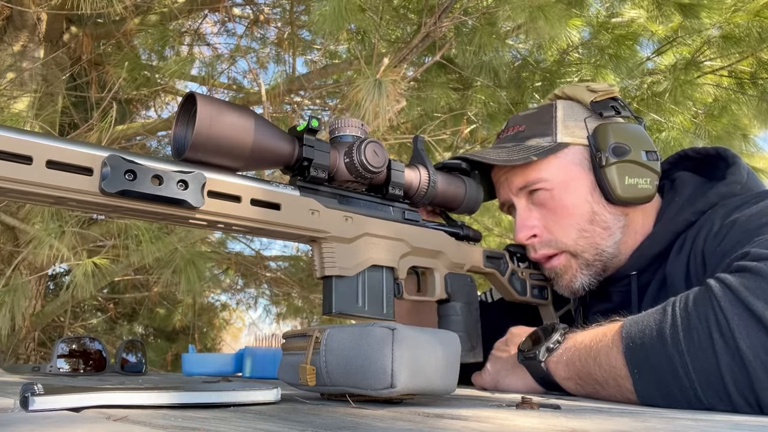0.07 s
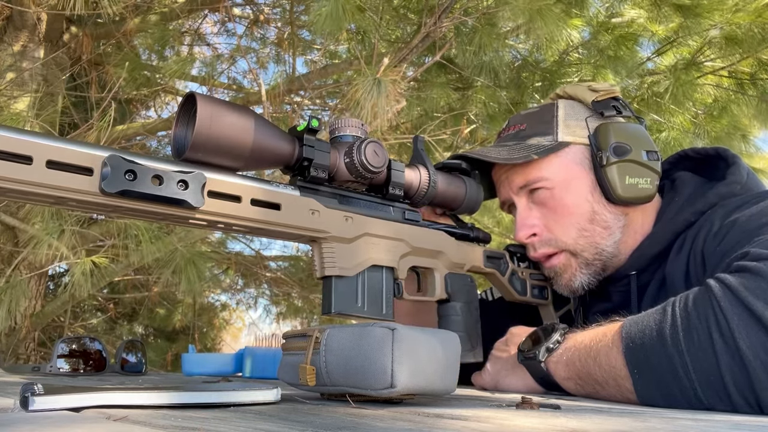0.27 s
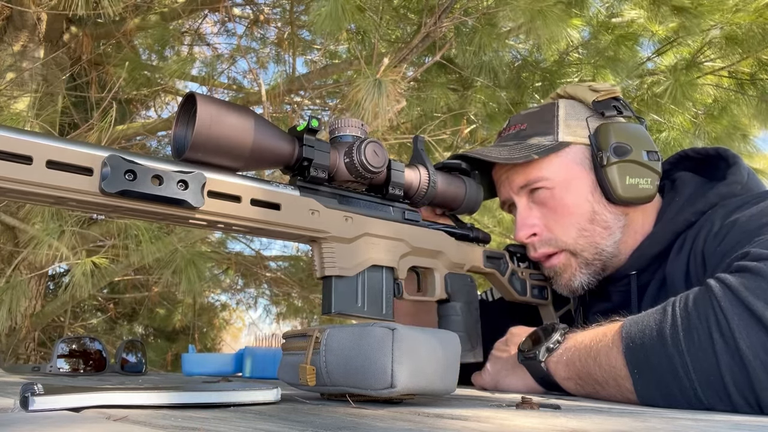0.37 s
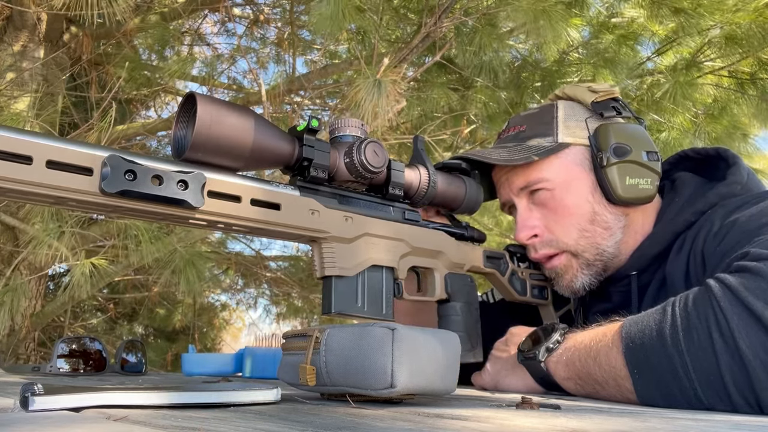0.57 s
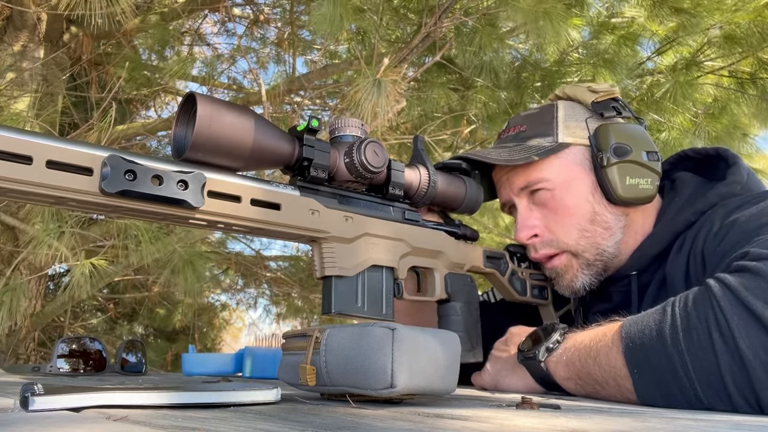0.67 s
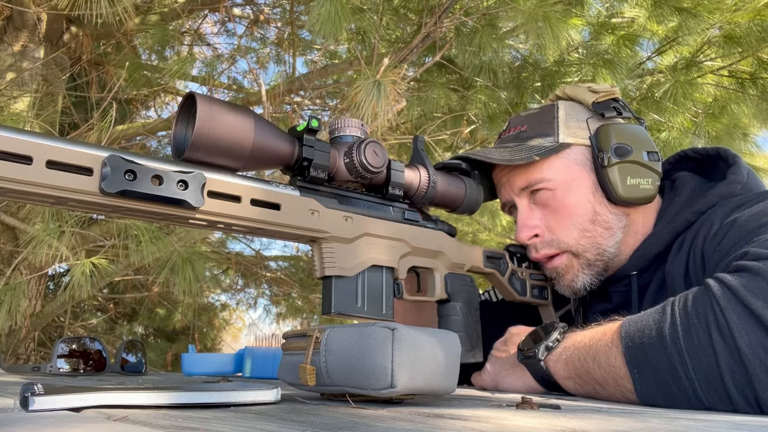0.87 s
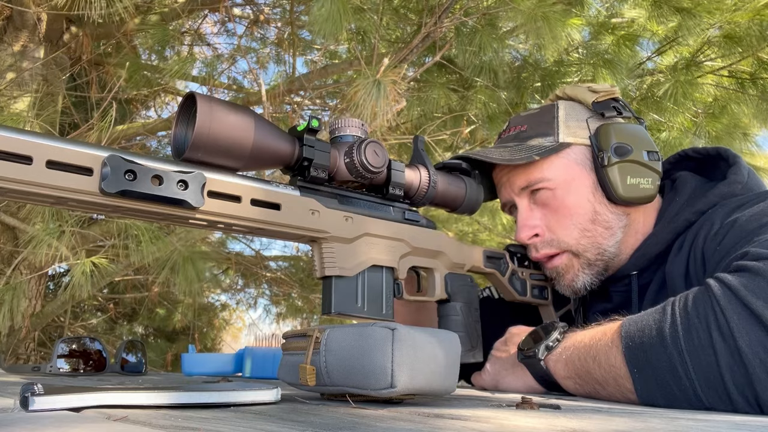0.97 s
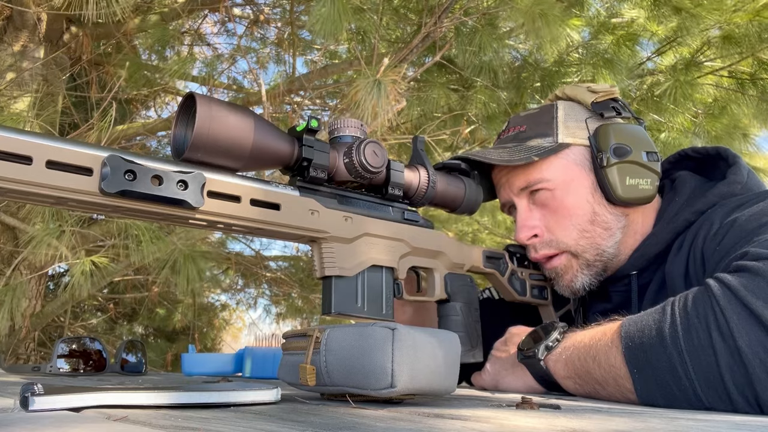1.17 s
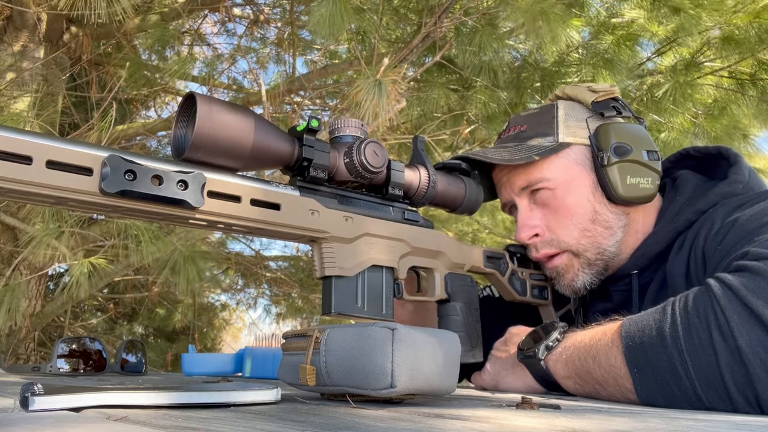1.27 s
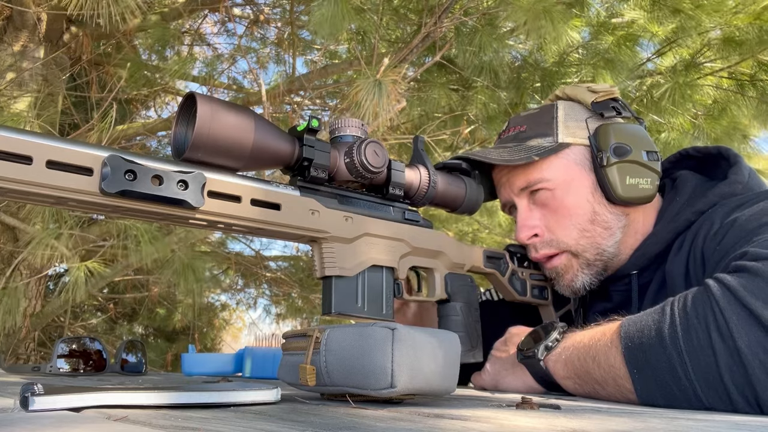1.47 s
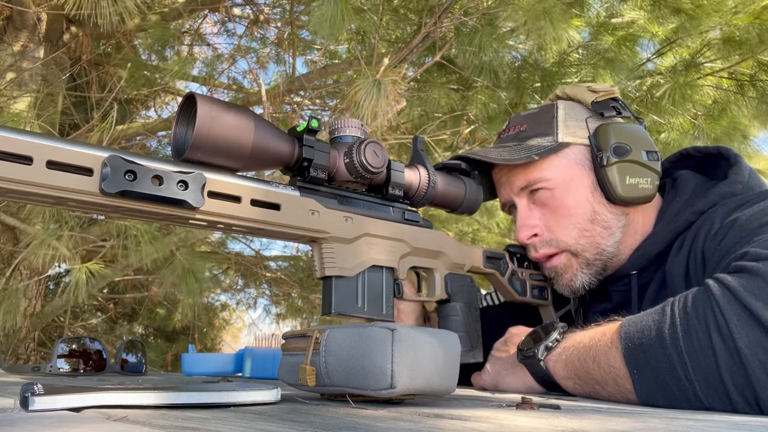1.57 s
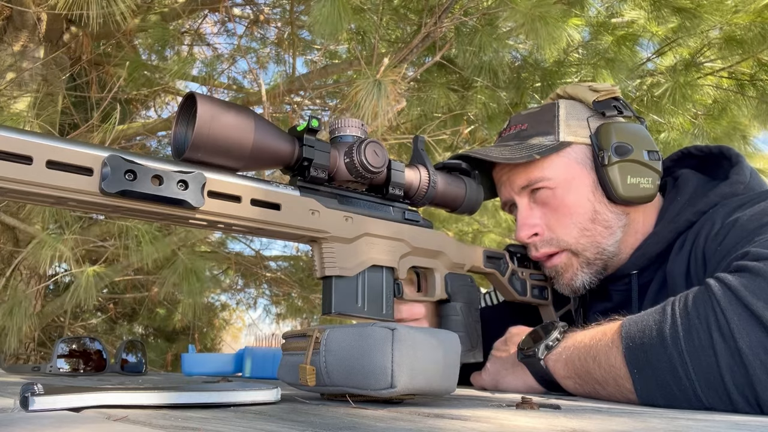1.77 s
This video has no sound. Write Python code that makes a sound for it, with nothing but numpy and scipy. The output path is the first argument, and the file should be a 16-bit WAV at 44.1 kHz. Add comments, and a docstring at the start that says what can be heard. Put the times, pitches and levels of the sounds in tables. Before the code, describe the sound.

A rifle bolt is lifted, drawn back, pushed home and locked with crisp steel clacks, brief scrapes and hollow stock knocks, close to the microphone on an outdoor bench; faint birds chirp behind low air rumble.

```python
"""Rifle bolt on a bench

A rifle lying on a wooden bench outdoors has its bolt cycled: lifted, drawn back, pushed home and locked.
Steel contacts are bursts of noise with ringing tones for the steel parts and the stock; filtered noise makes
the scrape of the bolt and the rubs of hand and sleeve. Slow-starting low tones make the bench boom.
Fading noise spreads reflections around; gliding tones are far birds, and filtered noise is the rumbling air.
"""
import sys
import numpy as np
from scipy import signal
from scipy.fft import rfft, irfft
from scipy.io import wavfile

SR = 44100
rng = np.random.default_rng(int(sys.argv[2]) if len(sys.argv) > 2 else 0)


def digitize_waveform(pressure):
    """Quantize a signal to 16-bit integers and store it at the path in sys.argv[1].

    Rows of a 2-D input are taken as channels; values are limited to [-1, 1].
    """
    field = np.atleast_2d(pressure).T
    bounded = np.clip(field, -1, 1)
    quanta = np.round(bounded * 32767).astype(np.int16)
    wavfile.write(sys.argv[1], SR, quanta)


N = 81585

# Hard steel contacts. Each row: peak of the crack in seconds, rise in seconds, fall in seconds, six crack levels
# in dB (one for each pitch in CRACK_HZ), knock pitch in Hz, knock level in dB, knock time to fade by 60 dB
# in seconds, pitch of the struck part in Hz, its level in dB.
CLACKS = [ (0.22, 0.0015, .0018, -49.5, -21, -26.5, -25.5, -17.5, -26, 847, -4, 0.04, 3320, -7.5),
          (.2660, 0.0012, .0025, -35, -30, -27.5, -27, -20.5, -27.5, 856.7, -13, 0.06, 5270, -18.5),
          (0.631, 0.00068, .0018, -50, -59.5, -48, -40.5, -28, -37, 760, -28.5, .04, 5840, -3),
          (0.8512, 0.001012, .0030, -54.5, -25.5, -27, -27, -21, -36, 937, -15, 0.056, 4000, -16.5),
          (0.8713, 0.0009, .0025, -48.5, -25.5, -24, -28.5, -16.5, -26, 868, -11, 0.027, 8050, -14),
          (.8780, 0.006, .0070, -47, -21, -45.5, -23.5, -17.5, -34.5, 611, -23, 0.041, 5106, 2),
          (0.951, 0.0092, 0.02, -48, -58.5, -38, -35, -28, -46, 780, -26, 0.044, 4005, -30),
          (1.0203, 0.0038, 0.0034, -44.5, -38, -38, -37.5, -32.5, -44.5, 759, -26.5, 0.054, 3050, -18.5),
          (1.374, .0012, .0016, -38, -31, -24.5, -28.5, -12.5, -29, 805, -10, 0.014, 3020, -10),
          (1.424, 0.00038, .0026, -61, -58.5, -41.5, -40.5, -26, -35, 930, -56.5, .03, 3765, -17.5),
          (1.5764, .0009, 0.0045, -42.5, -32, -40.5, -33, -31, -44, 912, -13.5, 0.048, 3210, -20)]
# Pitches at which the crack levels are given, in Hz.
CRACK_HZ = [400, 800, 1600, 3200, 6400, 12000]
# Light touches of hand and bolt.
# Each row: peak of the tick and start of the knock in seconds, stock knock in dB, steel tick in dB.
TOUCHES = [(0.127, -44.5, -81), (.337, -37.5, -55), (.534, -46.5, -71), (.597, -50, -44.5),
           (.645, -23, -46.5), (.684, -32, -60), (0.696, -45.5, -54), (.767, -26.5, -49),
           (.890, -21, -28.5), (0.903, -25, -35), (.922, -47, -38), (1.004, -40, -35.5),
           (1.121, -37.5, -54), (1.254, -40.5, -78)]
# Tone colour of a light tick: relative level in dB at each pitch in CRACK_HZ.
TOUCH_COLOUR_DB = [-24.5, -14, -2.5, -8.5, -5.5, -25.5]
# Tones of the stock under a light touch. Each row: pitch in Hz, relative level in dB, 60 dB fade in seconds.
TOUCH_KNOCK = [(700, -8, .028), (800, -3, .03), (915, -5, .032)]
# Tones of the knocked stock. Each row: pitch in Hz, relative level in dB, 60 dB fade in seconds.
STOCK = [(368.1, -26, 0.18), (424.3, -25, 0.17), (745, -26.5, .06), (776, -20.5, 0.11), (901, -15.5, .11),
         (1128, -29.5, .06)]
# Tones of the ringing steel. Each row: pitch in Hz, relative level in dB, 60 dB fade in seconds.
STEEL = [(2875, -5, .12), (3160, -4, .11), (3370, -4, .1), (4020, -5, .08), (4810, -2, .06),
         (5324, -3, .07), (5803, -5, .1), (6190, -7, .14), (7100, -6, .07), (11500, -6, .06)]
# Friction of the sliding bolt over time. Each row: time in seconds, level in dB.
SLIDE = [(0, -113), (.19, -67.5), (.21, -45.5), (.33, -53), (.44, -89), (.55, -65), (.61, -44.5),
         (.67, -62), (.745, -66.5), (.78, -50), (.84, -39), (.92, -46.5), (1.0, -48), (1.04, -42.5),
         (1.08, -62), (1.2, -74.5), (1.33, -82), (1.37, -40.5), (1.48, -60.5), (1.56, -50), (1.65, -71.5),
         (1.85, -77.5)]
# Tone colour of the friction. Each row: pitch in Hz, relative level in dB per Hz.
SLIDE_COLOUR = [(150, -11.5), (400, 3), (600, 7.5), (850, 17), (1200, 2.5), (2200, -3), (3500, -5),
                (5500, -0.5), (8000, -18.5), (12000, -24), (15000, -39.5)]
# Soft rubs of hand and sleeve on the stock. Each row: middle in seconds, half length in seconds, level in dB.
RUBS = [(0.134, 0.013, -61.5), (0.338, 0.035, -52), (0.554, 0.033, -58.5), (0.707, 0.0079, -51.5),
        (0.962, 0.023, -52), (1.839, 0.024, -62)]
# Tone colour of the rubs. Each row: pitch in Hz, relative level in dB per Hz.
RUB_COLOUR = [(120, -20.5), (300, 2), (420, 2.5), (650, -4), (1200, -13), (2500, -26.5), (5000, -26.5),
              (9000, -41.5), (15000, -55)]
# Jolts that reach the bench through the rest bag.
# Each row: start in seconds, level in dB, tilt towards the higher tones in dB per octave.
THUMPS = [(.274, -21, 3), (.708, -35.5, 3.5), (0.883, -32.5, 1.5), (1.04, -33.5, 0.5), (1.38, -31, 14.5),
          (1.585, -29, -6.5)]
# Tones of the bench top. Each row: pitch in Hz, relative level in dB, 60 dB fade in seconds.
BENCH = [(60.5, -2, 0.29), (97, 0.5, .22), (119.6, -9.5, 0.21), (182.3, -11.5, .22)]
# Delay of the right side. Each row: pitch in Hz, delay in seconds.
RIGHT_LAG_S = [(300, 0.00017), (900, 0.00018), (3000, 0.000047), (6000, 0.000078), (9000, 0.000069),
               (13000, 0.000083)]
# Bird notes. Each row: start in seconds, length in seconds, pitch in Hz, final drop in Hz, level in dB.
CHIRPS = [(-.045, .085, 2700, 450, -66), (.02, .14, 2470, 30, -69), (.44, .15, 2460, 30, -71),
          (.665, .05, 2400, 40, -63), (1.755, .115, 3070, 1300, -67)]
# Tone colour of the quiet air. Each row: pitch in Hz, relative level in dB per Hz.
AIR = [(25, -5.5), (60, 3.5), (120, 1.5), (230, -20), (500, -18), (800, -17.5), (1100, -19), (1400, -14),
       (1900, -28.5), (3300, -34), (6000, -41.5), (10000, -50.5), (15000, -54.5)]
# Low rumble over time. Each row: time in seconds, level in dB.
RUMBLE = [(0, -67), (.2, -49.5), (.42, -50.5), (.6, -52.5), (.7, -49.5), (.73, -41), (.8, -43), (1.08, -47),
          (1.22, -51.5), (1.35, -56.5), (1.45, -44.5), (1.55, -52.5), (1.65, -41.5), (1.8, -54.5)]
# Tone colour of the rumble. Each row: pitch in Hz, relative level in dB per Hz.
RUMBLE_COLOUR = [(25, -24.5), (55, 8.5), (100, 4.5), (160, -10), (300, -19.5), (900, -55.5)]

# Contacts: the lead is the time from the start of a burst to its peak.
LEAD_S, LEVEL_WINDOW_S = 0.02, 0.01
CHATTER_DB, CHATTER_S = -21.5, 0.013  # loose parts buzz on after a contact
GRAIN_DB = 3  # unevenness of the tiny impacts
STRIKE_SPREAD_DB = 2  # no two blows excite a tone alike
RING_ONSET_S = 0.001
STEEL_DB = -11  # ringing steel against the treble of the crack
PART_SPLIT, PART_TWIN_DB, PART_T60_S = 0.035, -9.5, 0.022  # the second tone is lower by this fraction
TOUCH_RISE_S, TOUCH_FALL_S = 0.0006, 0.003
SLIDE_GRAIN_DB = 5.5
BENCH_SOFT_S, BENCH_PIVOT_HZ = 0.011, 98

# Reflections: level in dB, time to fade by 60 dB in seconds, and a filter pitch in Hz.
GLANCE_DB, GLANCE_T60_S, GLANCE_HZ = -6, 0.003, 3000  # the treble glances off scope and chassis
NEAR_DB, NEAR_T60_S = -10, 0.07  # bench and shooter
BOARDS_DB, BOARDS_T60_S, BOARDS_HZ = -2, 0.17, 420  # the planks resound under the rifle
TAIL_DB, TAIL_T60_S, TAIL_DULL_HZ = -33, 0.6, 3000  # scatter from the trees
BIRD_ECHO_DB, BIRD_ECHO_T60_S = -5, 0.2  # far calls come blurred through the trees

BIRD_BEND = 3.5  # the higher, the later a note drops
AIR_DB, LEFT_DB = -61.5, 0.9
CUTOFF_HZ, TOP_HZ = 16500, 13900

T = np.arange(N) / SR
SHORT = T[:SR // 5]
EDGES = np.geomspace(200, 16000, 14)  # borders of the crack's bands, in Hz
BANK = [signal.butter(2, pair, "band", fs=SR, output="sos") for pair in zip(EDGES, EDGES[1:])]


def amp(db):
    """Turn decibels into a gain."""
    return 10 ** (np.asarray(db) / 20)


def unit(x):
    """Scale a sound to an average (rms) level of 1."""
    return x / np.sqrt(np.mean(x ** 2) + 1e-30)


def add(out, s, x):
    """Mix x into out from time s."""
    i = max(int(s * SR), 0)
    out[i:i + len(x)] += x[:max(N - i, 0)]


def level(curve):
    """Draw a gain over time through points of seconds and dB."""
    return amp(np.interp(T, *np.transpose(curve)))


def coloured(x, points):
    """Shape the spectrum of x through points of Hz and dB, then scale it to rms 1."""
    hz, db = np.transpose(points)
    f = np.maximum(np.fft.rfftfreq(N, 1 / SR), 1)
    gain = amp(np.interp(np.log(f), np.log(hz), db))
    gain = gain * (f > 24)  # drop the very lowest pitches
    return unit(irfft(rfft(x) * gain, N))


def ring(modes, t, onset_s):
    """A struck body sounds fading tones, which swell in softly over the onset."""
    # A single tone keeps its exact level; several each get a chance strength.
    spread_db = STRIKE_SPREAD_DB * (len(modes) > 1)
    tones = 0
    for hz, db, t60 in modes:
        fade = amp(db + spread_db * rng.normal() - 60 * t / t60)
        tones = tones + fade * np.sin(2 * np.pi * hz * t)
    return tones * (1 - np.exp(-t / onset_s))


def crack(rise, fall, octave_db):
    """Tiny impacts crowd up to a peak and die away, with a separate strength in each band."""
    t = SHORT - LEAD_S
    after = np.maximum(t, 0)
    chatter = amp(CHATTER_DB) * np.exp(-after / CHATTER_S)
    shape = np.exp(np.minimum(t, 0) / rise) * (np.exp(-after / fall) + chatter)
    noise = rng.standard_normal((2, len(t)))
    impacts = shape * noise * amp(GRAIN_DB * rng.standard_normal(len(t)))
    log_middles = np.log(EDGES[1:] * EDGES[:-1]) / 2
    gains = amp(np.interp(log_middles, np.log(CRACK_HZ), octave_db))
    bands = 0
    for k, (sos, gain) in enumerate(zip(BANK, gains)):
        # Neighbouring bands use different noise.
        bands = bands + gain * unit(signal.sosfilt(sos, impacts[k % 2]))
    # Each band gets the energy of a steady tone of its level lasting the level window.
    return bands * np.sqrt(LEVEL_WINDOW_S / SHORT[-1] / 2)


def clacks():
    """The bolt hits cam, stop and lugs: a crack, ringing steel and a hollow knock in the stock."""
    out = np.zeros(N)
    for s, rise, fall, *octave_db, knock_hz, knock_db, knock_t60, part_hz, part_db in CLACKS:
        hollow = ring([(knock_hz, 0, knock_t60)], SHORT, RING_ONSET_S)
        knock = amp(knock_db) * (hollow + ring(STOCK, SHORT, RING_ONSET_S))
        treble_db = np.mean(octave_db[3:5])
        steel = amp(STEEL_DB + treble_db) * ring(STEEL, SHORT, RING_ONSET_S)
        # The struck part rings with a pair of close tones.
        main = (part_hz, part_db, PART_T60_S)
        twin = (part_hz * (1 - PART_SPLIT), part_db + PART_TWIN_DB, PART_T60_S)
        add(out, s - LEAD_S, crack(rise, fall, octave_db))
        add(out, s, knock + steel)
        add(out, s - rise, ring([main, twin], SHORT, rise))
    return out


def touches():
    """Light contacts as the hand works the bolt: a short steel tick and a small stock knock."""
    out = np.zeros(N)
    for s, knock_db, tick_db in TOUCHES:
        tick = amp(tick_db) * crack(TOUCH_RISE_S, TOUCH_FALL_S, TOUCH_COLOUR_DB)
        add(out, s - LEAD_S, tick)
        add(out, s, amp(knock_db) * ring(TOUCH_KNOCK, SHORT, RING_ONSET_S))
    return out


def slide():
    """Steel rubs on steel in uneven grains of noise, coloured by the rifle."""
    noise = rng.standard_normal(N)
    grains = noise * amp(SLIDE_GRAIN_DB * rng.standard_normal(N))
    return level(SLIDE) * coloured(grains, SLIDE_COLOUR)


def rubs():
    """Cloth and skin brush the stock: coloured noise in short, smooth swells."""
    swell = sum(amp(db) * np.exp(-0.5 * ((T - s) / half) ** 2) for s, half, db in RUBS)
    return swell * coloured(rng.standard_normal(N), RUB_COLOUR)


def bench():
    """Each jolt sets the bench top booming softly in a few low tones."""
    out = np.zeros(N)
    for s, thump_db, tilt_db in THUMPS:
        modes = [(hz, db + tilt_db * np.log2(hz / BENCH_PIVOT_HZ), t60) for hz, db, t60 in BENCH]
        add(out, s, amp(thump_db) * ring(modes, T[:SR], BENCH_SOFT_S))
    return out


def placed(x):
    """Place a sound slightly left: the left side is louder and the right hears it later."""
    f = np.fft.rfftfreq(N, 1 / SR)
    lag = np.interp(f, *np.transpose(RIGHT_LAG_S))
    right = irfft(rfft(x) * np.exp(-2j * np.pi * f * lag), N)
    return np.array([x * amp(LEFT_DB), right])


def scatter(x, t60, dull_hz, onset_s):
    """Many reflections blur together like fading noise, different on each side and dulled in the treble."""
    t = T[:SR]
    echoes = rng.standard_normal((2, SR)) * amp(-60 * t / t60) * (1 - np.exp(-t / onset_s))
    dull = signal.butter(1, min(dull_hz, SR / 2 - SR / 20), fs=SR, output="sos")
    echoes = signal.sosfilt(dull, unit(echoes) / np.sqrt(SR))
    return signal.fftconvolve(x[None], echoes, axes=1)[:, :N]


def birds():
    """Far birds whistle single tones that nearly hold their pitch, then drop."""
    out = np.zeros(N)
    for s, length, hz, drop_hz, db in CHIRPS:
        progress = np.clip((T - s) / length, 0, 1)
        swell = np.sqrt(np.abs(np.sin(np.pi * progress)))
        pitch = hz - drop_hz * progress ** BIRD_BEND
        out += amp(db) * swell * np.sin(2 * np.pi * np.cumsum(pitch) / SR)
    return out


def air(shared=0.3):
    """Quiet open air and a swelling low rumble: coloured noise, partly shared by the two sides."""
    hush, rumble = rng.standard_normal((2, 2, N)) + shared * rng.standard_normal((2, 1, N))
    return amp(AIR_DB) * coloured(hush, AIR) + level(RUMBLE) * coloured(rumble, RUMBLE_COLOUR)


def scene():
    """Mix the rifle, the bench, their reflections and the woods around."""
    rifle = clacks() + touches() + slide()
    thump = bench()
    highs = signal.sosfilt(signal.butter(2, GLANCE_HZ, "high", fs=SR, output="sos"), rifle)
    glance = amp(GLANCE_DB) * scatter(highs, GLANCE_T60_S, dull_hz=16000, onset_s=0.0003)
    near = amp(NEAR_DB) * scatter(rifle, NEAR_T60_S, dull_hz=11900, onset_s=0.0025)
    far = amp(TAIL_DB) * scatter(rifle, TAIL_T60_S, dull_hz=TAIL_DULL_HZ, onset_s=0.013)
    lows = signal.sosfilt(signal.butter(4, BOARDS_HZ, fs=SR, output="sos"), rifle)
    boards = amp(BOARDS_DB) * scatter(lows, BOARDS_T60_S, dull_hz=890, onset_s=0.005)
    boom = amp(-3) * placed(thump)
    boom = boom + amp(-5.5) * scatter(thump, 0.14, dull_hz=600, onset_s=0.0027)
    calls = birds()
    woods = amp(BIRD_ECHO_DB) * scatter(calls, BIRD_ECHO_T60_S, dull_hz=8000, onset_s=0.0055)
    woods = woods + air()
    direct = placed(rifle + rubs() + calls)
    return direct + glance + near + far + boards + boom + woods


def record(dry):
    """Round off the peaks, then remove the very top of the treble with two filters."""
    rounded = 1.1 * np.tanh(dry / 1.1)
    x = signal.sosfilt(signal.butter(12, TOP_HZ, fs=SR, output="sos"), rounded)
    return signal.sosfilt(signal.cheby2(12, 60, CUTOFF_HZ + 500, fs=SR, output="sos"), x)


dry = scene()
out = record(dry)
digitize_waveform(out)
```